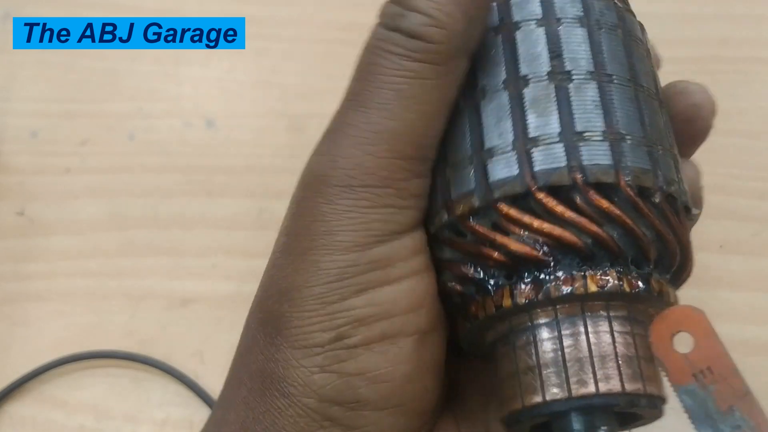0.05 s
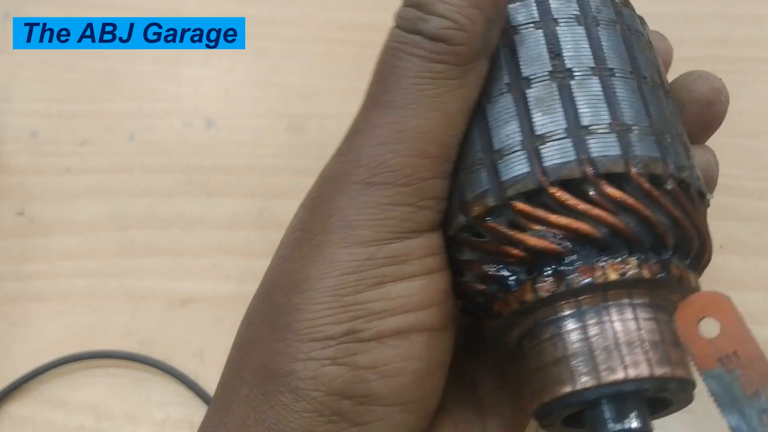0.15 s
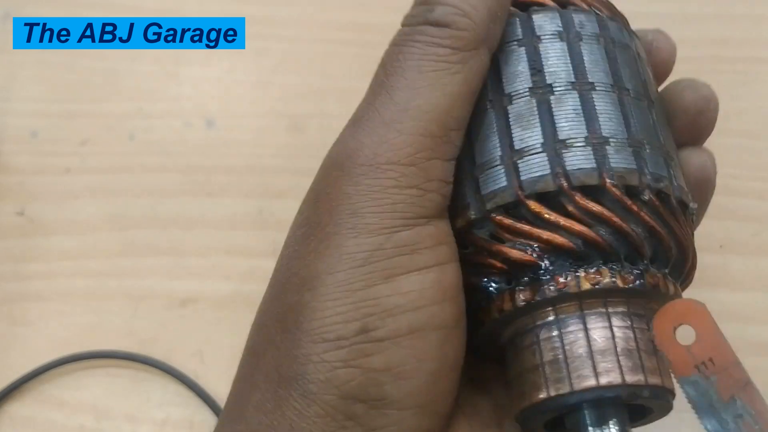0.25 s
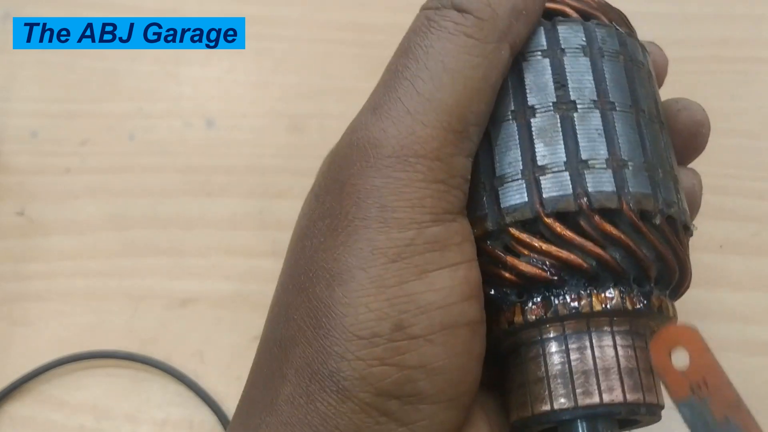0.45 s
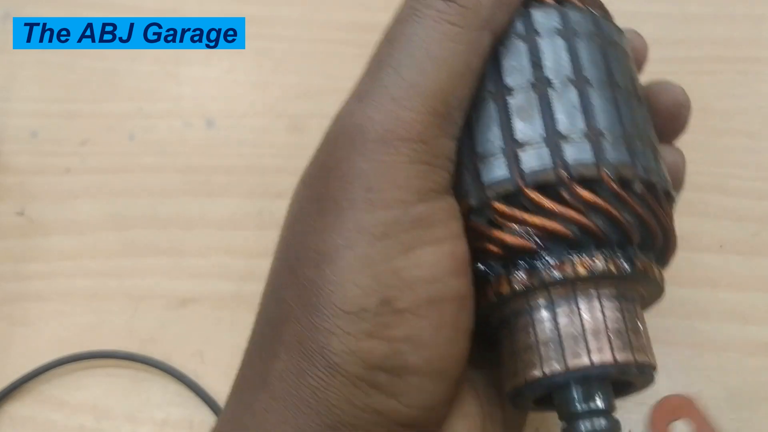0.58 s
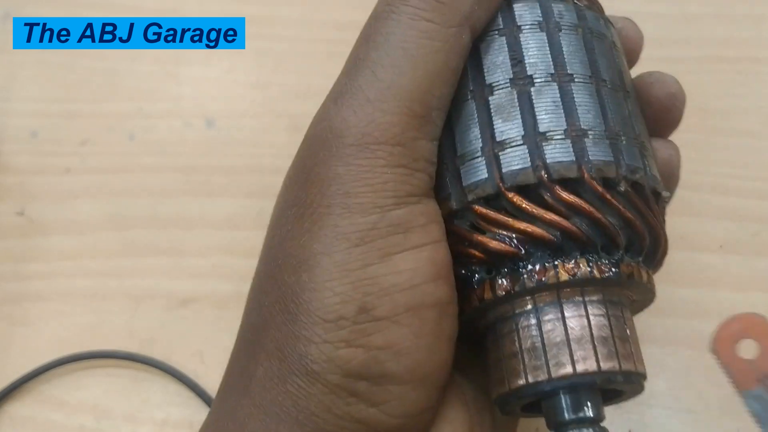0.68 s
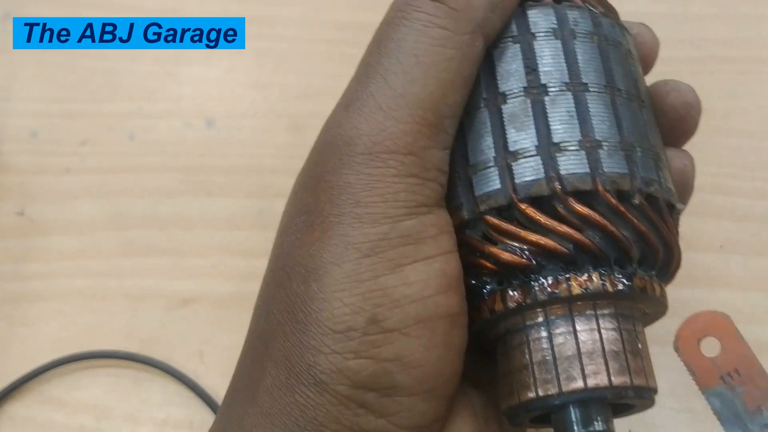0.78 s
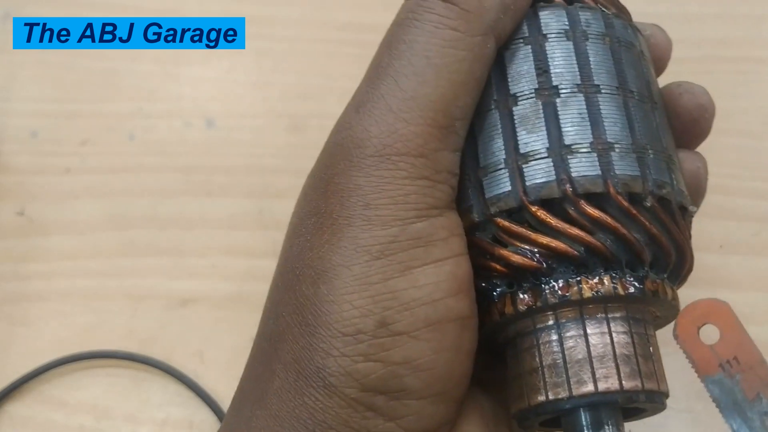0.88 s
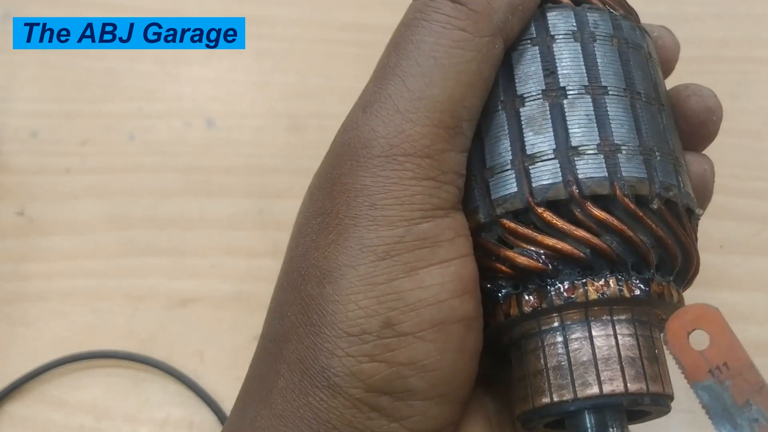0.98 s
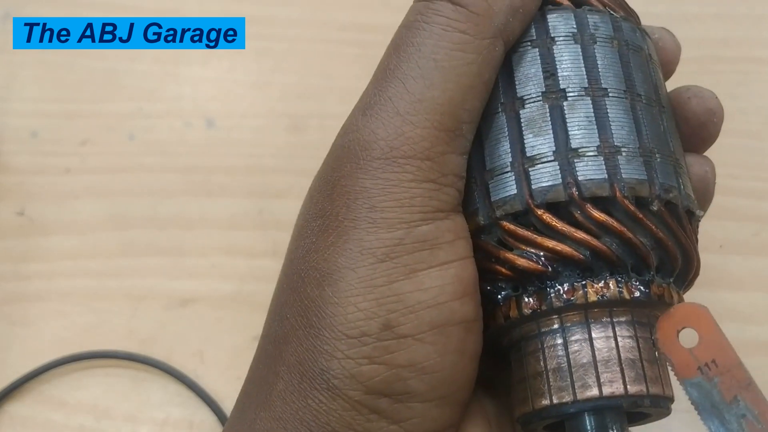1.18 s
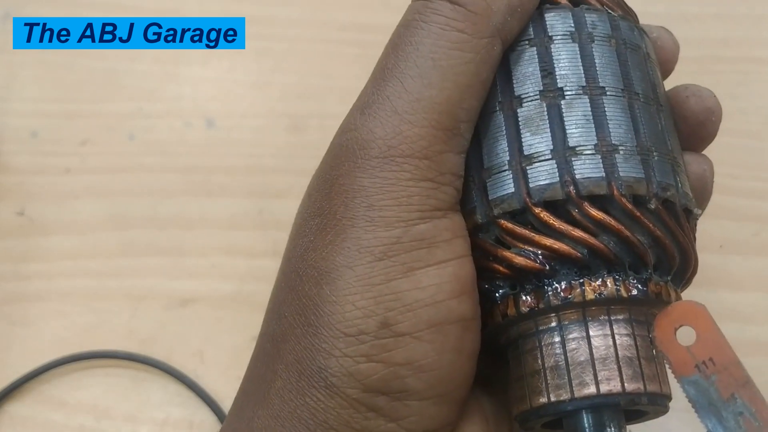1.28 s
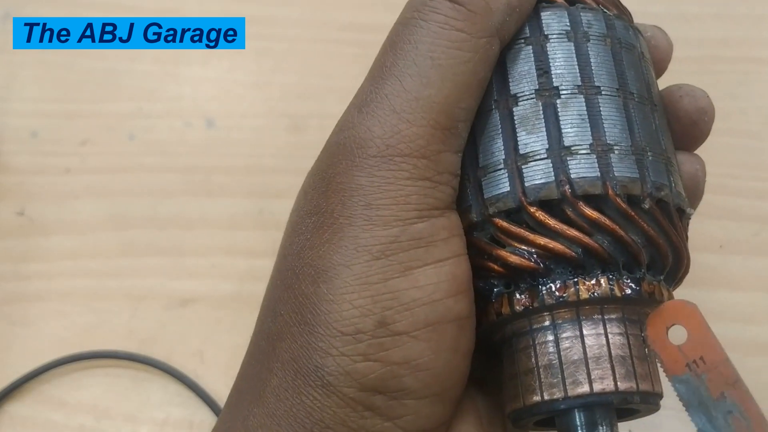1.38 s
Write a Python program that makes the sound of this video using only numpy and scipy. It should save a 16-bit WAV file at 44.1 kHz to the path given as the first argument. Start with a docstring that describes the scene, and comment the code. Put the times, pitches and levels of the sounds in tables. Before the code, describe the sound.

A thin steel blade scrapes the copper slots of a hand-held motor part, close up. Two tiny faint scratches come at 0.04-0.07 seconds, then a gritty rasp from 0.16 ends in a sharp, bright triple snap at 0.22. Another rasp at 0.47-0.53 breaks into a brief squeaky judder. Afterwards only dull, uneven rustling, low handling rumble and faint room hiss remain until about 1.45.

```python
"""An old hacksaw blade is drawn along the slots of a motor's copper commutator, held in the hand close to
the microphone. Each short stroke is a gritty rasp: dense grains of slip hiss, ring the hand-damped blade modes
and rub dully in the armature. One stroke ends in a sharp snag of struck modes, the next in a stick-slip judder.
Behind lie filtered noise for a dull, uneven rustle and handling rumble, and workshop hiss with wavering rings."""
import sys
import numpy as np
from scipy import signal
from scipy.fft import rfft, irfft
from scipy.io import wavfile
from scipy.ndimage import uniform_filter1d

SR = 44100
rng = np.random.default_rng(int(sys.argv[2]) if len(sys.argv) > 2 else 0)


def store_wav(level_fs):
    """Save 16-bit WAV to argv[1]."""
    pcm = np.round(np.clip(np.atleast_2d(level_fs), -1, 1) * 32767)
    wavfile.write(sys.argv[1], SR, pcm.T.astype(np.int16))


N = 63945  # length in samples
LEFT_LEAD_S = .00004  # blade sounds reach the left port this much earlier


def undb(db):
    """Decibels to gain."""
    return 10 ** (np.asarray(db) / 20)


def unit(x):
    """Scale to rms 1."""
    return x / np.sqrt(np.mean(x ** 2))


def freqs():
    """Frequency of each spectral bin in Hz."""
    return np.arange(N // 2 + 1) * SR / N


def colour(x, points):
    """Filter by (Hz, dB) points joined on a log-frequency axis."""
    hz, db = np.array(points, float).T
    gain = undb(np.interp(np.log(freqs() + 1), np.log(hz), db))
    return irfft(rfft(x) * gain, N)


def pan(balance_db):
    """Left and right gains of unit mean power; positive leans left."""
    return unit(undb(np.array([[balance_db], [-balance_db]]) / 2))


def walk(rate_hz):
    """Smooth random motion of rms 1, drawing rate_hz new values a second."""
    hold = max(int(SR / rate_hz), 1)
    steps = np.repeat(rng.standard_normal(N // hold + 1), hold)
    return unit(uniform_filter1d(steps, hold)[:N])


def resonance(hz, width):
    """Response of a damped mode, two equal stages of the given width in Hz, gain 1 at its centre."""
    f = freqs()
    stage = 1j * f * width / (hz ** 2 - f ** 2 + 1j * f * width)
    return stage ** 2


# Wavering bands of narrowed noise in the room.
# Each row: centre in Hz, half the stage width in Hz, level in dB before the waver, left-right balance in dB.
ROOM_RINGS = [(3803, 130, -73.5, -8.5), (5920, 440, -78.5, 4), (1177, 54, -75, 15), (2387, 250, -78, -7.5)]
HISS_DB, RING_WAVER_DB = -70, 4


def workshop():
    """The room around the bench: even hiss, and noise narrowed by resonances into thin, wavering rings."""
    room = undb(HISS_DB) * rng.standard_normal((2, N))
    for hz, half_width, db, balance_db in ROOM_RINGS:
        ring = unit(irfft(rfft(rng.standard_normal(N)) * resonance(hz, 2 * half_width), N))
        level = undb(db + RING_WAVER_DB * walk(50.22))
        room = room + level * pan(balance_db) * ring
    return room


# Swells of the handling rumble. Each row: time in seconds, level in dB before the trim.
RUMBLE_LEVEL = [(0.0, -61), (0.044, -52), (0.075, -53.3), (0.09, -63), (0.225, -50.5), (0.315, -59.1),
                (0.39, -48.5), (0.42, -59.5), (0.525, -49), (0.555, -68), (0.6, -50), (0.705, -67),
                (0.84, -50), (0.885, -69), (0.945, -46), (0.96, -49), (1.005, -71), (1.05, -49),
                (1.11, -47.5), (1.14, -55), (1.17, -50.4), (1.29, -63), (1.38, -51), (1.45, -58.4)]
# Spectrum of the handling rumble. Each row: frequency in Hz, relative level in dB.
RUMBLE_SPECTRUM = [(12, -2), (25, 4), (60, 4), (95, -1.5), (135, -14), (300, -37), (1000, -54)]
RUMBLE_TRIM_DB, RUMBLE_SIDE_DB = -2, -12.5


def rumble(t):
    """Soft, uneven handling rumble: deep noise, mostly alike at both ports of the microphone."""
    mid, side = rng.standard_normal((2, N))
    ports = mid + undb(RUMBLE_SIDE_DB) * side * np.array([[1], [-1]])
    at, db = np.array(RUMBLE_LEVEL).T
    level = undb(np.interp(t, at, db) + RUMBLE_TRIM_DB)
    return unit(colour(ports, RUMBLE_SPECTRUM)) * level


# Swells of the rustle. Each row: time in seconds, level in dB before trim and flutter.
RUSTLE_LEVEL = [(0.0, -59), (0.015, -68.5), (0.045, -53.5), (0.15, -59), (0.165, -47), (0.27, -51),
                (0.285, -59.4), (0.345, -52), (0.36, -57.5), (0.39, -49), (0.42, -60), (0.465, -46.5),
                (0.54, -47.1), (0.57, -59), (0.585, -48.5), (0.645, -51), (0.675, -59.5), (0.72, -62.5),
                (0.75, -52.5), (0.765, -69), (0.78, -54), (0.81, -60), (0.84, -50.5), (0.87, -62),
                (0.945, -48.5), (1.005, -61), (1.05, -50.5), (1.2, -54), (1.245, -62.5), (1.26, -57.5),
                (1.32, -60), (1.365, -50), (1.395, -56), (1.45, -51.5)]
# Spectrum of the rustle. Each row: frequency in Hz, relative level in dB.
RUSTLE_SPECTRUM = [(59, -31), (100, 0), (149, -3.5), (281, -3), (362, -10), (564, -13), (898, -12),
                   (1060, -20), (1920, -24.5), (3390, -26.5), (3770, -26.5), (4280, -31), (15500, -34)]
# Lean of the rustle. Each row: frequency in Hz, left-right balance in dB.
RUSTLE_BALANCE = [(100, 0), (1100, -1.5), (2500, -3.5), (4000, -6), (6000, 0), (15000, -1)]
RUSTLE_TRIM_DB, RUSTLE_SIDE_DB, RUSTLE_FLUTTER_DB = -1, -12.5, 1.43
RUSTLE_TREBLE_HZ, RUSTLE_TREBLE_SHARE = 1480, 0.89  # the treble follows only this share of the swing


def rustle(t):
    """A dull rustle swells and sinks as the hands work; its bass is central, its treble wide and steadier."""
    mid, side = rng.standard_normal((2, N))
    side = colour(side, [(250, RUSTLE_SIDE_DB), (700, -3.5), (4000, 4), (8000, -.5)])
    ports = []
    for sign in (1, -1):  # left, right
        lean = [(hz, sign * db / 2) for hz, db in RUSTLE_BALANCE]
        ports.append(colour(mid + sign * side, lean))
    noise = unit(colour(np.array(ports), RUSTLE_SPECTRUM))
    low = irfft(rfft(noise) / (1 + (freqs() / RUSTLE_TREBLE_HZ) ** 2), N)
    treble = noise - low

    at, level_db = np.array(RUSTLE_LEVEL).T
    db = np.interp(t, at, level_db)
    swing_db = db - db.mean() + RUSTLE_FLUTTER_DB * walk(110)
    moving = low * undb(swing_db) + treble * undb(RUSTLE_TREBLE_SHARE * swing_db)
    return undb(db.mean() + RUSTLE_TRIM_DB) * moving


def steel(force, modes, soft_hz):
    """A force, rounded by the contact above soft_hz, rings the blade; the left port hears it slightly first."""
    body = sum(undb(db) * resonance(hz, width) * pan(balance_db) for hz, width, db, balance_db in modes)
    lead = np.exp(2j * np.pi * freqs() * np.array([[LEFT_LEAD_S], [0]]))
    contact = signal.butter(2, soft_hz, fs=SR, output="sos")
    rounded = signal.sosfilt(contact, force)
    return irfft(rfft(rounded) * body * lead, N)


def blows(events):
    """One impulse for each (seconds, dB) row, placed between samples by its phase."""
    return irfft(sum(undb(db) * np.exp(-2j * np.pi * freqs() * at) for at, db in events), N)


# The tip snapping over the end of the slot. Each row: time in seconds, relative strength in dB.
SNAGS = [(.21876, -11), (.22078, -5), (.22253, -13)]
# Modes of the pinned tip.
# Each row: centre in Hz, stage width in Hz, relative level in dB, left-right balance in dB.
TIP_MODES = [(1391, 349, -19, 10), (1859, 465, -17, -5), (2299, 401, -11, -7), (3264, 206, -1, -7),
             (3706, 874, 0, -7), (5310, 1404, -23, -7)]
# Spectrum of the dry crack of the snap. Each row: frequency in Hz, gain in dB.
CRACK_SPECTRUM = [(500, -14), (2000, -1), (8000, -4), (9500, -2), (15000, 3)]
SNAG_TRIM_DB, TIP_SOFT_HZ = -2, 5000
CRACK_DB, CRACK_DECAY_S = -32.5, 0.0011


def snag(t):
    """The tip snaps over the copper edge three times in quick succession, ringing and cracking drily."""
    ring = steel(blows(SNAGS), TIP_MODES, TIP_SOFT_HZ)
    peak = undb(max(db for _, db in SNAGS) + SNAG_TRIM_DB)
    ring = ring * peak / np.abs(ring).max()
    bursts = sum(undb(db) * (t > at) * np.exp(-np.abs(t - at) / CRACK_DECAY_S) for at, db in SNAGS)
    crack = colour(bursts * rng.standard_normal((2, N)), CRACK_SPECTRUM)
    return ring + undb(CRACK_DB) * crack


GRAINS_PER_S, GRAIN_SPREAD_DB = 5000, 4.5


def grains():
    """Dense tiny slips of random sign and uneven size."""
    hit = rng.random(N) < GRAINS_PER_S / SR
    size_db = GRAIN_SPREAD_DB * np.minimum(rng.exponential(size=N), 4)
    return unit(hit * rng.choice([-1, 1], N) * undb(size_db))


# Modes of the blade sliding in the slot.
# Each row: centre in Hz, stage width in Hz, relative level in dB, left-right balance in dB.
SLIDE_MODES = [(1240, 340, -14, -2.5), (1705, 300, -15.5, 2), (2517, 324, -2.5, -14),
               (2780, 320, -3.5, -33), (3305, 430, -4.5, -26), (3645, 170, -8, -11), (5600, 880, -13, -25)]


def sliding_blade(soft_hz):
    """Grains of slip ring the hand-damped blade as it slides in the slot."""
    return unit(steel(grains(), SLIDE_MODES, soft_hz))


# Teeth catching during a stroke. Each row: start in seconds, strength in dB before the squeak and slip gains.
CATCHES = [(.2048, -35), (.4675, -32), (.4835, -29), (.4865, -29), (.4930, -29), (.5202, -20.5),
           (.5241, -19), (.5280, -27), (.5313, -19.5)]
CATCH_S, CATCH_SOFT_HZ = 0.0044, 7500
SQUEAK_HZ, SQUEAK_WOBBLE = 2540, 0.03437  # wobble is an rms fraction of the pitch
SQUEAK_DB, SQUEAK_PAN_DB, SLIP_DB = -10.5, -14.5, -11.5


def judder(t):
    """A tooth catches and chatters free: a few stick-slip cycles near the blade's main mode, with grit."""
    # each catch is a half-sine hump
    slip = sum(undb(db) * np.sin(np.pi * np.clip((t - at) / CATCH_S, 0, 1)) for at, db in CATCHES)
    turns = np.cumsum(SQUEAK_HZ * (1 + SQUEAK_WOBBLE * walk(400))) / SR
    lead_turns = SQUEAK_HZ * np.array([[LEFT_LEAD_S], [0]])
    squeak = unit(np.sin(2 * np.pi * (turns + lead_turns))) * pan(SQUEAK_PAN_DB)
    grit = sliding_blade(CATCH_SOFT_HZ)
    return slip * (undb(SQUEAK_DB) * squeak + undb(SLIP_DB) * grit)


# Strokes of the blade. Each row: start in seconds, end in seconds, attack time constant in seconds,
# force at mid-stroke in dB, swell from start to end in dB, blade ring relative to the force in dB.
STROKES = [(.035, .046, .002, -51, -9.5, 0), (.055, .066, .004, -55, 1, -9), (.164, .213, .005, -44, 9, -5),
           (.466, 0.531, .011, -42.3, 5.5, -1.5)]
# Spectrum of the rasp's grit. Each row: frequency in Hz, relative level in dB.
GRIT_SPECTRUM = [(300, 1), (1000, -6), (1900, -15), (2800, 4), (4500, -1.5), (6000, -2), (8000, -2),
                 (10500, -7.5), (15500, -10.5)]
# Spectrum of the dull rub of the held armature. Each row: frequency in Hz, relative level in dB.
ARMATURE_SPECTRUM = [(50, -25), (130, -1), (200, 0), (320, -2), (500, -10), (1000, -16), (2500, -40)]
STROKE_RELEASE_S, SLIDE_SOFT_HZ = .008, 7240
GRIT_DB, GRIT_PAN_DB, ARMATURE_DB = -5, 2, -13


def rasp(t):
    """Pressure changes through each stroke; the slips hiss, ring the blade and rub dully in the armature."""
    grit_force, ring_force = 0, 0
    for start, end, attack, db, swell_db, ring_db in STROKES:
        along = np.clip((t - start) / (end - start), 0, 1)
        before, after = np.maximum(start - t, 0), np.maximum(t - end, 0)
        gate = np.exp(-before / attack - after / STROKE_RELEASE_S)
        force = gate * undb(db + swell_db * (along - 0.5))
        grit_force = grit_force + force
        ring_force = ring_force + force * undb(ring_db)
    two_ports = np.array([grains(), grains()])
    hiss = undb(GRIT_DB) * unit(colour(two_ports, GRIT_SPECTRUM)) * pan(GRIT_PAN_DB)
    rub = undb(ARMATURE_DB) * unit(colour(grains(), ARMATURE_SPECTRUM))
    return grit_force * (hiss + rub) + ring_force * sliding_blade(SLIDE_SOFT_HZ)


def scene():
    """Blade sounds close to the microphone, over the background."""
    t = np.arange(N) / SR
    background = workshop() + rumble(t) + rustle(t)
    blade = snag(t) + judder(t) + rasp(t)
    return background + blade


TOP_HZ = 15900


def record(dry):
    """The recorder cuts the top steeply."""
    return signal.sosfilt(signal.ellip(10, .1, 70, TOP_HZ, fs=SR, output="sos"), dry)


dry = scene()
out = record(dry)
store_wav(out)
```